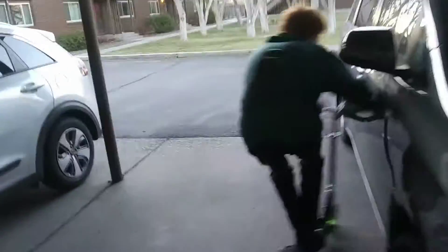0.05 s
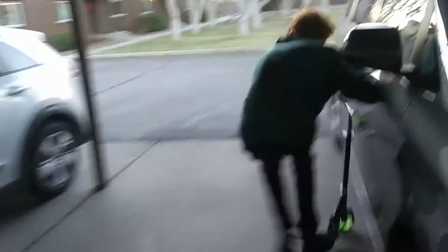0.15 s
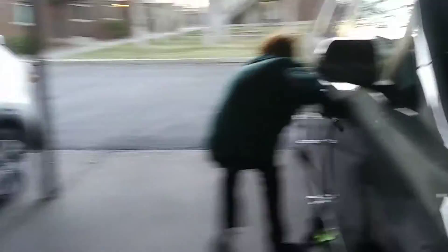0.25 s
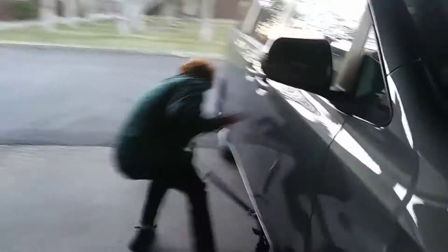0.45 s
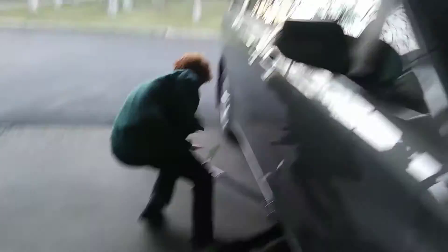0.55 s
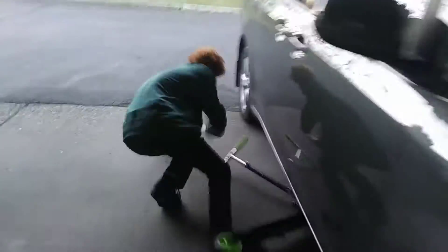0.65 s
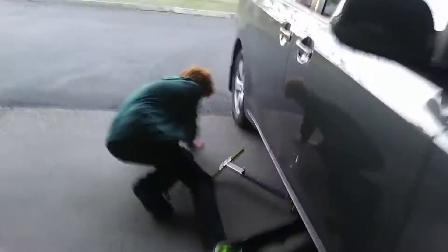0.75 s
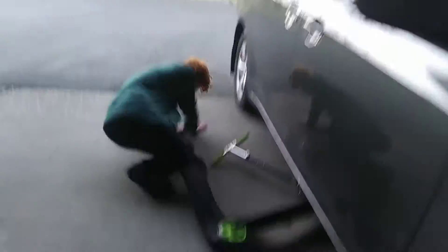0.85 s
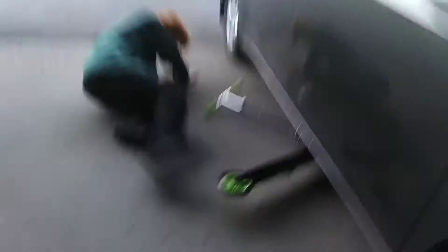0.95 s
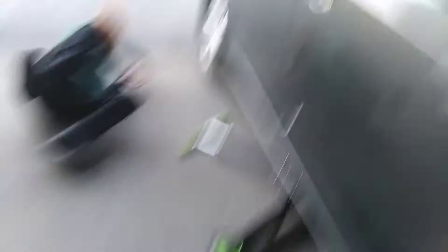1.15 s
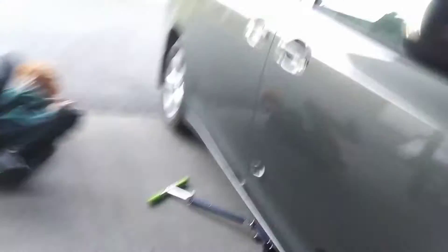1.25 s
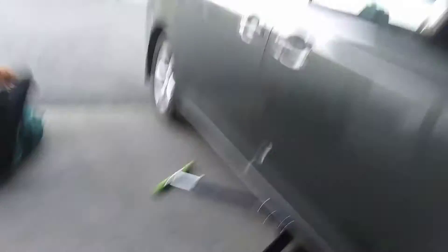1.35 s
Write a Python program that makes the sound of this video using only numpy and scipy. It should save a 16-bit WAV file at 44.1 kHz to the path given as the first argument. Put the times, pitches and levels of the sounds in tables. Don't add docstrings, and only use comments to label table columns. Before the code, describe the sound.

A metal kick scooter bangs down a car door, then crashes and clatters on concrete.

```python
import sys
import numpy as np
from scipy import signal
from scipy.io import wavfile
from scipy.ndimage import uniform_filter1d

SR = 44100
rng = np.random.default_rng(int(sys.argv[2]) if len(sys.argv) > 2 else 0)


def invert_db(x):
    u = np.asarray(x, float) / 20
    return 10 ** u


def log_audio(samples):
    frames = np.atleast_2d(samples).T
    limited = np.clip(frames, -1, 1)
    pcm = np.round(limited * 32767).astype(np.int16)
    wavfile.write(sys.argv[1], SR, pcm)


N = 61739

# [f/Hz, level/dB per Hz]
STREET_TONE = [(35, -68), (60, -30), (363, 3.5), (822, -7), (1010, -1), (1140, -13), (1740, -11),
               (6000, -10), (16000, -30)]
# [f/Hz, t60/s]
CARPORT_DECAY = [(200, 0.24), (530, 0.63), (1400, 0.48), (3700, 0.38), (9700, 0.31)]

# [t/s, level/dB]
SCUFF_CURVE = [(0.75, -48), (0.792, -28), (0.97, -52)]
# [t/s, level/dB]
STEP_CURVE = [(1.17, -67), (1.21, -44), (1.26, -38.5), (1.32, -59)]
# [f/Hz, level/dB per Hz]
SCUFF_TONE = [(88, -64), (150, -41), (422, -9.5), (675, -25), (1020, -16), (1420, -7.5), (7620, -13),
              (16000, -33.5)]

# [t/s, level/dB, f/Hz, ring t60/s, room/dB]
TAPS = [(.037, -62, 2100, .004, -20), (0.067, -22.5, 6970, 0.0086, -17.5), (.4905, -9, 5600, .006, -40),
        (.5012, -5, 5300, .011, -40), (.79335, -4.5, 2050, .0042, -44), (1.2977, -23, 1700, .006, -27),
        (.9905, -35, 7500, .004, -27), (1.07, -9, 2230, 0.0046, -37), (0.89, -39.5, 830, 0.0072, -4),
        (1.304, -31.5, 1750, 0.022, -5.5)]
# [t/s, level/dB, f/Hz, ring t60/s, room/dB]
TICKS = [(.9911, -18, 950, .018, -23), (.9907, -27, 2000, .009, -22), (.9978, -21, 1100, .012, -17),
         (.9963, -24, 2300, .004, -20), (1.2983, -24, 2000, .007, -30), (.7938, -24, 420, .005, -40),
         (.7932, -15, 2900, .002, -40), (1.298, -22, 1150, .005, -30), (.7775, -33, 11000, .003, -40),
         (.2655, -8, 2600, .003, -40), (.2815, -7, 1300, .005, -40), (.2845, -7, 2600, .003, -40),
         (.4075, -24, 7500, .004, -40), (.5102, -7, 2800, .004, -40), (.981, -36, 700, .006, -2),
         (.9868, -33, 1900, .008, -10), (1.0358, -6, 3200, .003, -40), (1.0366, -8, 1500, .004, -40),
         (.037, -52, 5000, .003, -12)]
# [f/Hz, level/dB per Hz]
TAP_TONE = [(88, -47), (150, -8), (675, 3.5), (1260, 6.5), (1420, 2), (1900, 8), (16000, -56)]

# [t/s, level/dB]
BAR_TOUCHES = [(.852, -41), (1.21, -45.5), (1.299, -47.5)]
# [f/Hz, first touch level/dB, second touch level/dB, third touch level/dB, t60/s]
BAR_MODES = [(1028, -5, -11, -6.5, .6), (1087, -15, -11, 5, 1.6), (1260, -9, -9, -4, .7),
             (1900, -15, -9, 1.5, 0.75), (2062, 1, -8, -15, .6), (2272, 0, -6, -19, 0.46),
             (4140, -12, -9.5, -14, .7), (4113, -2, -12.5, -23, 0.74), (4500, -11, -8, -25, 0.65),
             (4913, -7, -9, -13, .8), (5660, -6, -6, -24, 1), (7400, -7, -4, -22, 0.59)]

# [t/s, level/dB, bass/dB, treble/dB, rattle/s]
BUMPS = [(.0665, -17, 0, 7.5, 0.0041), (.079, -25.5, 2.5, 14.5, 0.0033), (.117, -34.5, 14.5, 17.5, 0.0025),
         (.15, -37.5, 14.5, -19, 0.0042), (.176, -30, 13, -16, 0.004)]
# [f/Hz, level/dB, t60/s]
BUMP_MODES = [(298, -4.5, 5.0), (351.5, -1, 5.0), (782, -6, 0.33), (1043, 5, 0.16), (1050, -15, 0.23)]
# [f/Hz, level/dB per Hz]
BUMP_TONE = [(150, -7), (297, 0), (1040, -14.5), (1790, -12.5), (2100, -13), (3700, -26.5), (7470, -27),
             (10500, -38), (16000, -47)]

# [t/s, level/dB, bass/dB, treble/dB, rattle/s]
DOOR_BLOWS = [(.2205, -19.5, 8, 13.5, 0.0019), (.2305, -9.5, 1, -1.5, 0.018), (.2525, -5, -4, 3.5, 0.0042),
              (.265, -1.5, -3.5, -15, 0.011), (.282, -4.5, -5, -32, 0.0023),
              (.318, -10, -0.5, -3.5, 0.0052), (.345, -14, -9, -2, 0.011), (.359, -11, -16, -1, 0.014),
              (.377, -8.5, -18, -6, 0.0026), (.409, -19.5, -27, 2, 0.0092), (.469, -23, -12, 6.5, 0.021)]
# [f/Hz, level/dB, t60/s]
DOOR_MODES = [(284.4, -5, 0.37), (555.6, -1, 0.71), (652, 6, 0.47), (700, 5, 0.22), (728, -14, 0.19),
              (778, -5, 0.32), (1026, -4, 0.76), (1260, -27, 0.13), (1889, 10.5, 0.094), (2450, 0, 0.098)]
# [f/Hz, level/dB per Hz]
DOOR_TONE = [(150, -22), (275, -4), (457, -7.5), (689, -4.5), (837, -6.5), (1060, -8.5), (7180, -20),
             (10500, -34), (16000, -38)]

# [t/s, level/dB, bass/dB, treble/dB, rattle/s]
FALL_BLOWS = [(1.0338, -19, -3, 12, 0.0025), (1.0362, -4, -7, 1, 0.0073), (1.045, -4, 2, 1.5, 0.0055),
              (1.060, -5, -10.5, -3, 0.018), (1.208, -31.5, 7, 4, 0.01)]
# [f/Hz, level/dB, t60/s]
FALL_MODES = [(985, -4, .4), (1114, -2, .6), (1030, -7, .5), (1246, -6, .5), (1436, -9, .4),
              (1886, -1, .45), (1943, -1, .5), (2064, -5, .5), (2658, -6, .45), (2910, -2, .4),
              (3548, -9, .4), (4752, -7, .35), (4895, -9, .45), (7125, -10, .3)]
# [f/Hz, level/dB per Hz]
FALL_TONE = [(150, -47), (759, -9), (1120, -1.5), (1580, -8), (1940, -7), (3400, -13.5), (7000, -13),
             (10500, -30), (16000, -35)]

# [t/s, level/dB, bass/dB, treble/dB, rattle/s]
FRAME_BLOWS = [(.487, -14, -36.5, 10.5, 0.012), (.4985, -15.5, 4.5, 3, 0.0029), (.5102, -6, -18, 2, 0.0087),
               (.525, -5.5, -33, -0.5, 0.0017), (.555, -15, -8, 4, 0.0084), (.5785, -3.5, -2, -10, 0.0043),
               (.581, -11.5, 4, 18, 0.0064), (.591, -12, 4, 13, 0.0059), (.605, -6.5, -3, 12.5, 0.0086),
               (.625, -5.5, -7, 4.5, 0.0088), (.641, -14.5, -13, 12.5, 0.0088),
               (.654, -9.5, -4.5, -19, 0.0074), (.671, -22, 0, -3, .006), (.777, -47, -20, 20, .004),
               (.864, -27, 15.5, 2.5, 0.0093)]
# [f/Hz, level/dB, t60/s]
FRAME_MODES = [(1050, -9, .45), (1118, -4, .55), (1190, -2, .55), (1255, -4, .5), (1390, -6, .45),
               (1930, -5, .5), (2030, -5, .45), (2780, -7, .4), (4020, -11, .35), (4480, -9, .3),
               (4760, -10, .3), (4960, -10, .3), (5760, -14, .3), (7080, -10, .25)]
# [f/Hz, level/dB per Hz]
FRAME_TONE = [(150, -30.5), (475, -15.5), (1140, -1.5), (1690, -8.5), (1940, -4), (3290, -12.5),
              (7180, -17.5), (10500, -35), (16000, -40)]

# [t/s, length/s, side level/dB]
WIDE_MOMENTS = [(.066, .035, -8), (.577, .03, -11), (1.034, .007, -7)]

BASS_HZ, TREBLE_HZ = 910, 3450
CRACK_DB, CRACK_T60_S, BUILD_S = 5, 0.041, 0.0055
CONTACTS_PER_S, RING_SHARE, MODE_LUCK_DB = 600, 0.62, 3
LINGER_DB, LINGER_T60_S = -19, 1.1
MIC_LOW_HZ, MIC_TOP_HZ = 191, 15800
KNEE_DB, RELEASE_DB_PER_S, ATTACK_HZ, LIMIT = -6, 150, 60, .78
SIDE_HZ = 4700


def rms_one(x):
    return x / np.sqrt(np.mean(x ** 2) + 1e-20)


def cut(x, hz, kind, order=2):
    return signal.sosfilt(signal.butter(order, hz, kind, fs=SR, output="sos"), x)


def at_hz(points, hz):
    freqs, values = np.array(points).T
    return np.interp(np.log(hz), np.log(freqs), values)


def shelf(hz, bass_db, treble_db):
    return bass_db / (1 + (hz / BASS_HZ) ** 4) + treble_db / (1 + (TREBLE_HZ / hz) ** 4)


def place(out, s, sound):
    start = int(s * SR)
    out[start:start + len(sound)] += sound


def noise(spectrum, colours=None):
    dies = colours is not None
    count, length = (len(colours), SR // 2) if dies else (1, N)
    t = np.arange(length) / SR
    white = rng.standard_normal((count, 2, length))
    out, power = 0, 0
    edges = 100 * 2 ** (np.arange(23) / 3)
    for k, (low, high) in enumerate(zip(edges, edges[1:])):
        hz = np.sqrt(low * high)
        gain = invert_db(at_hz(spectrum, hz))
        power += gain ** 2 * (high - low) * 2 / SR
        if dies:
            room = invert_db(-60 * t / max(at_hz(CARPORT_DECAY, hz), .05)) * (1 - np.exp(-t / BUILD_S))
            crack = invert_db(CRACK_DB - 60 * t / CRACK_T60_S)
            colour = invert_db(shelf(hz, *np.transpose(colours)))[:, None]
            gain = gain * (room + crack) * colour
        out = out + gain * cut(white[:, k % 2], [low, high], "band")
    return out / np.sqrt(power)


def street():
    return invert_db(-52) * noise(STREET_TONE)[0]


def scuff():
    t = np.arange(N) / SR
    level = 0
    for curve in (SCUFF_CURVE, STEP_CURVE):
        level = level + invert_db(-3 + np.interp(t, *np.transpose(curve), left=-99, right=-99))
    grit = 1 + 0.13 * rms_one(cut(rng.standard_normal(N), 150, "low"))
    return uniform_filter1d(level, size=600) * grit * noise(SCUFF_TONE)[0]


def knocks(rows, droop):
    out, t = np.zeros(2 * N), np.arange(SR // 2) / SR
    rooms = noise(TAP_TONE, np.tile([0, -8], (len(rows), 1)))
    for (s, db, hz, t60, room_db), room in zip(rows, rooms):
        sag = droop * 1500 / hz * (hz < 2500) + 1
        bent_time = t / 5 + 4 / 5 * (1 - np.exp(-sag * t)) / sag
        envelope = invert_db(-60 * t / max(t60, .001)) * (1 - np.exp(-2 * t * hz))
        knock = np.sin(2 * np.pi * hz * bent_time) * envelope
        place(out, s, invert_db(db) * (knock / knock.max() + invert_db(room_db) * room))
    return out[:N]


def taps():
    return knocks(TAPS, droop=1550)


def ticks():
    return knocks(TICKS, droop=0)


def bar():
    out, t = np.zeros(2 * N), np.arange(SR // 2) / SR
    swell = 1 - np.exp(-t / 0.013)
    fade_out = np.cos(np.pi * t) ** 2
    for k, (s, db) in enumerate(BAR_TOUCHES):
        for hz, *levels, t60 in BAR_MODES:
            ring = invert_db(db + levels[k] - 60 * t / t60) * np.sin(2 * np.pi * hz * t)
            place(out, s, ring * swell * fade_out)
    return out[:N]


def blows(rows, tone, modes, ring_db, spread=1):
    rows, t, out = np.array(rows), np.arange(SR // 2) / SR, np.zeros(2 * N)
    bass_db, treble_db = rows[:, 2], rows[:, 3]
    responses = noise(tone, rows[:, 2:4])
    luck = rng.standard_normal((len(rows), len(modes)))
    for k, (hz, db, t60) in enumerate(modes):
        split, phase = spread * rng.uniform(0.0069, 0.027), rng.uniform(0, 2 * np.pi)
        first = np.sin(2 * np.pi * hz * t)
        second = np.sin(2 * np.pi * hz * (1 + split) * t + phase)
        gain = invert_db(ring_db + db + MODE_LUCK_DB * luck[:, k] + shelf(hz, bass_db, treble_db))
        linger = invert_db(LINGER_DB - 60 * t / LINGER_T60_S) * first * np.cos(np.pi * t) ** 2
        decay = invert_db(-60 * t / np.clip(RING_SHARE * t60, .05, .4))
        responses += np.outer(gain, decay * (first + second) + linger)
    t = t[:SR // 10]
    draws = rng.random((len(rows), 2, len(t)))
    for (s, db, _, _, rattle), (chance, sizes), response in zip(rows, draws, responses):
        hits = (chance < CONTACTS_PER_S / SR) * (2 * sizes - 1)
        burst = hits * np.exp(-t / max(rattle, .001))
        burst[0] = 1
        sound = signal.fftconvolve(burst / np.linalg.norm(burst), response)
        place(out, s, invert_db(db - 11.5) * sound)
    return out[:N]


def first_bumps():
    return blows(BUMPS, BUMP_TONE, BUMP_MODES, ring_db=-10)


def door_slide():
    return blows(DOOR_BLOWS, DOOR_TONE, DOOR_MODES, ring_db=-13.5)


def bar_fall():
    return blows(FALL_BLOWS, FALL_TONE, FALL_MODES, ring_db=-5.5, spread=0.388)


def frame_crash():
    return blows(FRAME_BLOWS, FRAME_TONE, FRAME_MODES, ring_db=-10.5)


def scene():
    background = street() + scuff()
    details = taps() + ticks() + bar()
    crash = first_bumps() + door_slide() + bar_fall() + frame_crash()
    mid = background + details + crash
    return np.array([mid, mid])


def roll_off(x):
    return signal.sosfilt(signal.butter(12, 16650, fs=SR, output="sos"), x)


def record(dry):
    x, t = cut(dry[0], MIC_LOW_HZ, "high", order=4), np.arange(N) / SR
    level = 10 * np.log10(cut(x ** 2, ATTACK_HZ, "low", order=1) + 1e-12)
    release = RELEASE_DB_PER_S * t
    held = np.maximum.accumulate(level + release) - release
    over = np.maximum(held - KNEE_DB, 0)
    x = x * invert_db(-over) / LIMIT
    x = LIMIT * x / (1 + x ** 4) ** .25
    x = signal.sosfilt(signal.ellip(8, .5, 45, MIC_TOP_HZ, fs=SR, output="sos"), x)
    gate = sum(invert_db(db) * (t > s) * (t < s + length) for s, length, db in WIDE_MOMENTS)
    delayed = np.pad(x, (37, 0))[:N]
    side = cut(gate * delayed, SIDE_HZ, "high", order=8)
    return roll_off(np.array([x + side, x - side]))


dry = scene()
out = record(dry)
log_audio(out)
```